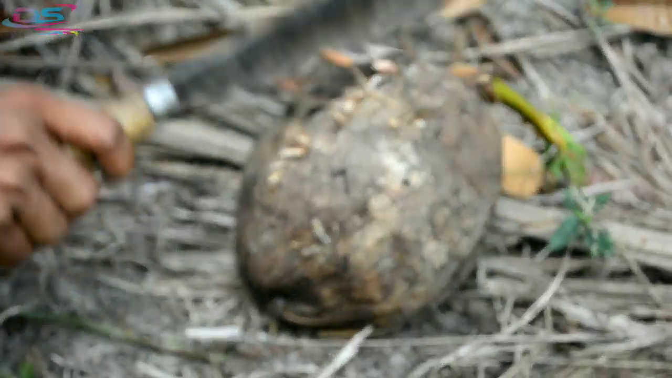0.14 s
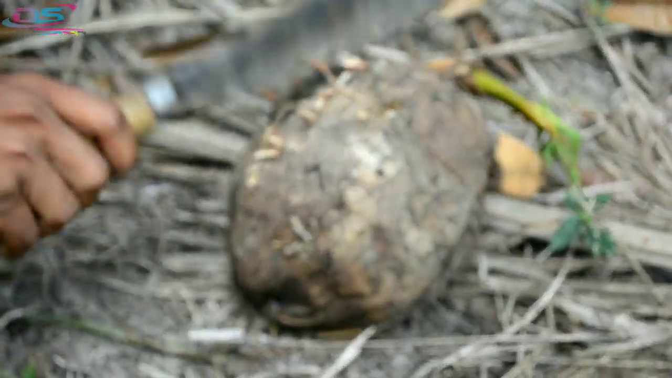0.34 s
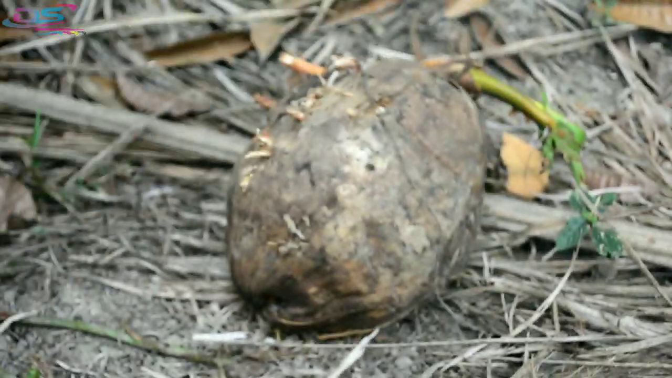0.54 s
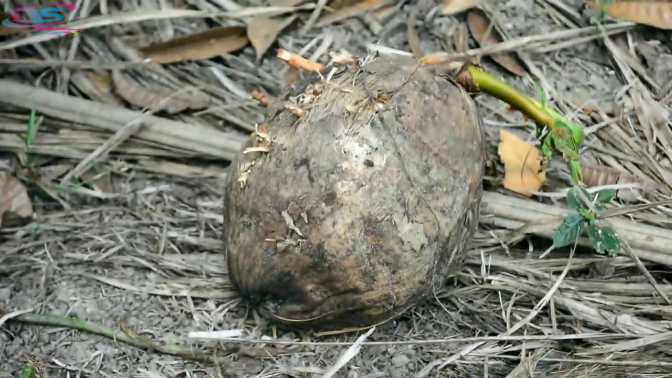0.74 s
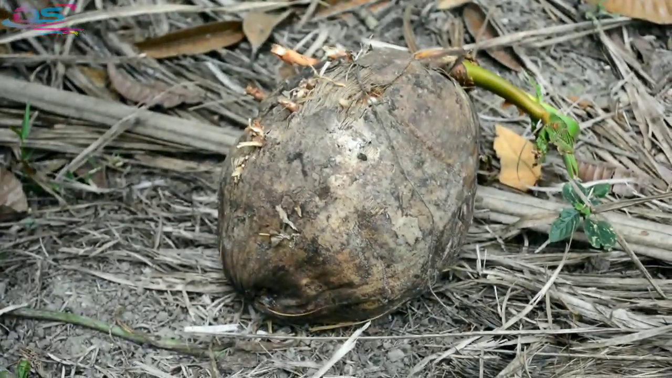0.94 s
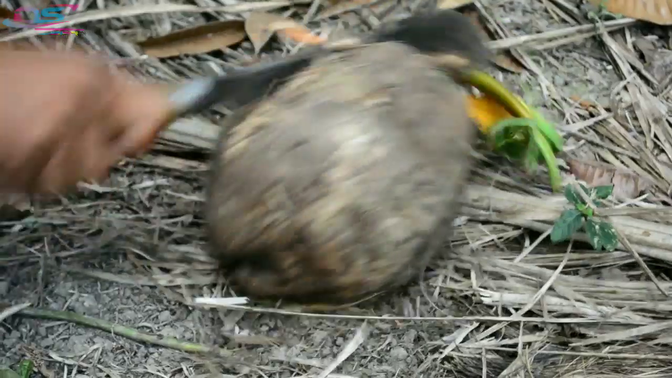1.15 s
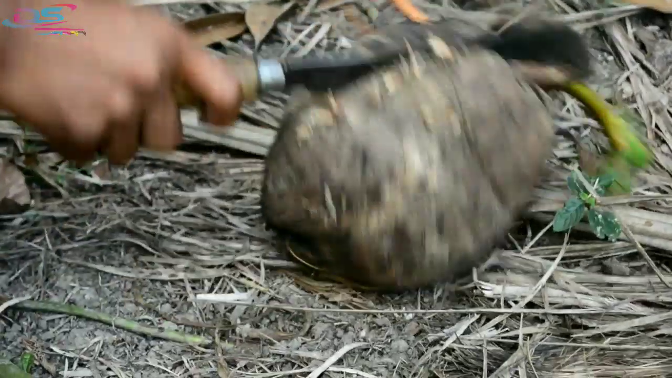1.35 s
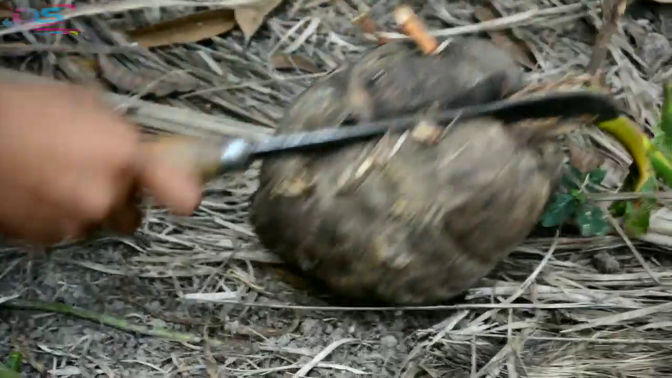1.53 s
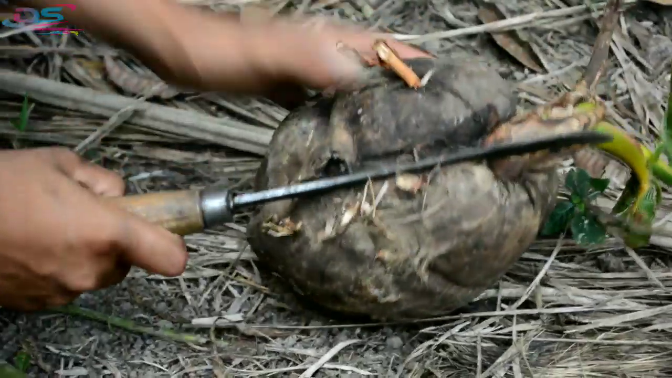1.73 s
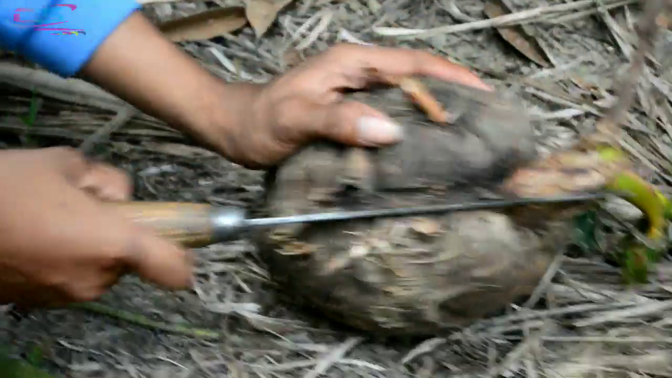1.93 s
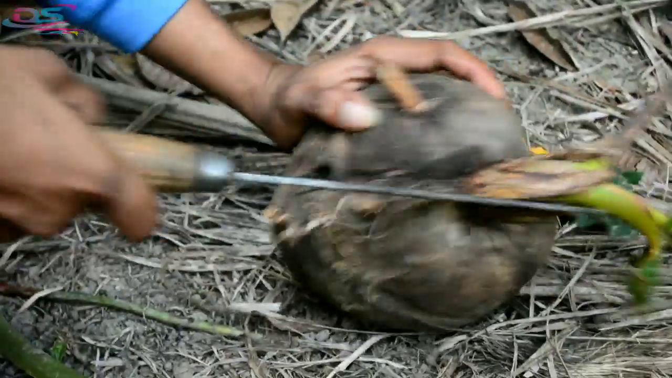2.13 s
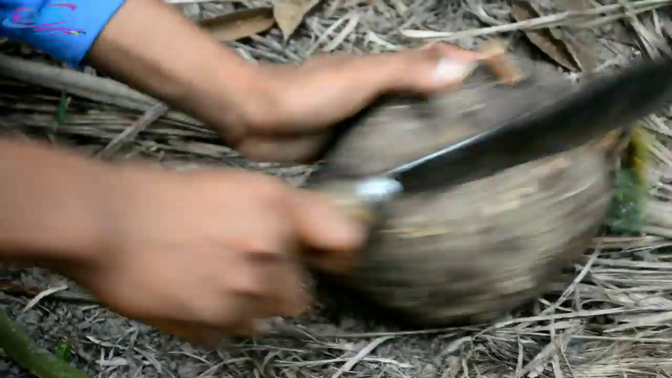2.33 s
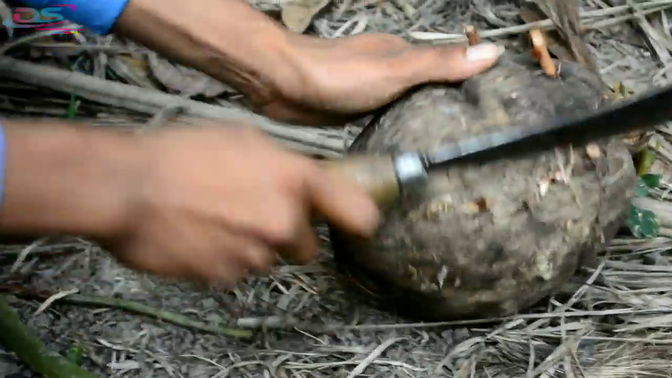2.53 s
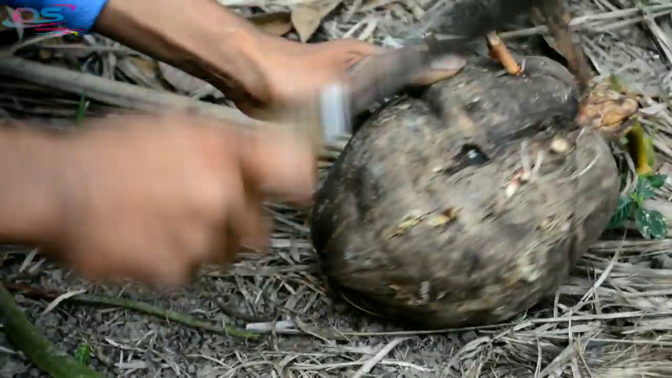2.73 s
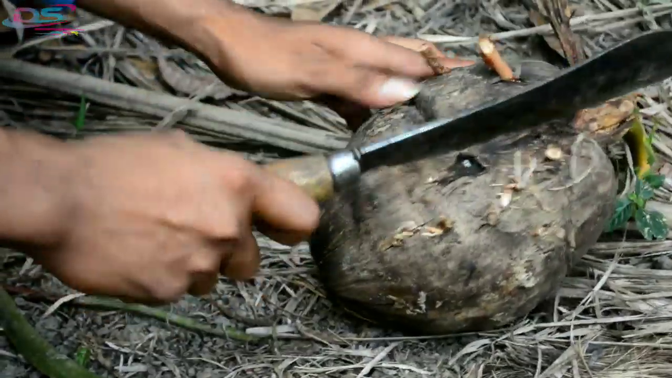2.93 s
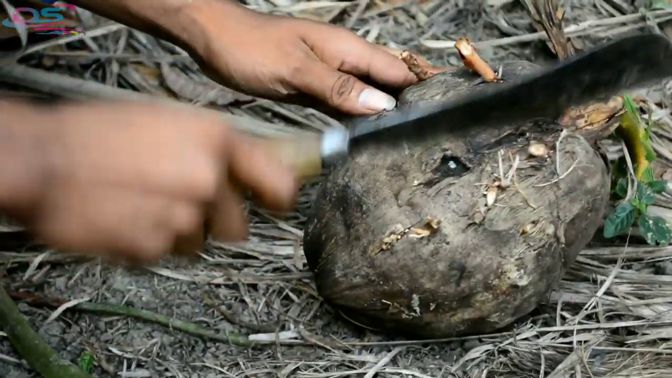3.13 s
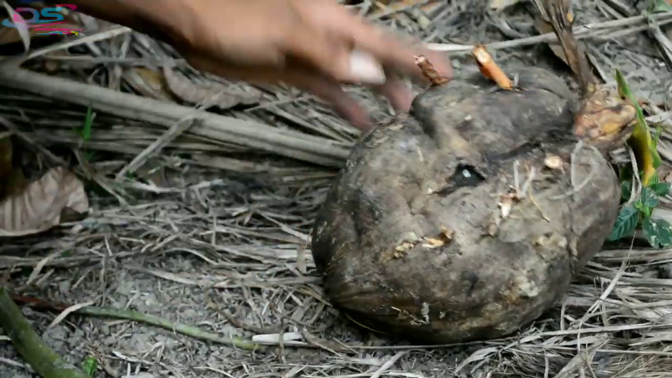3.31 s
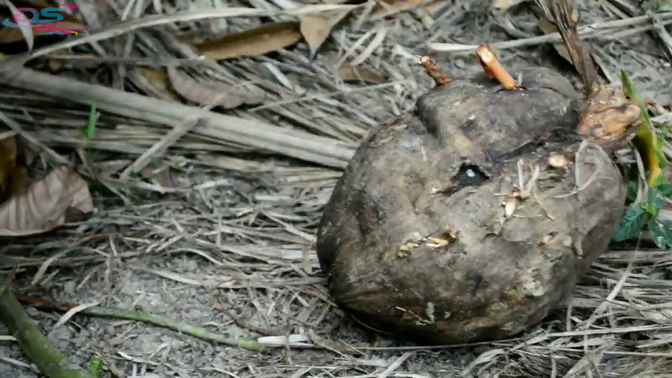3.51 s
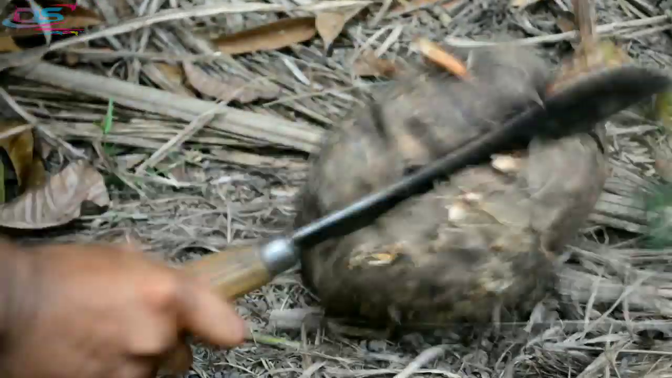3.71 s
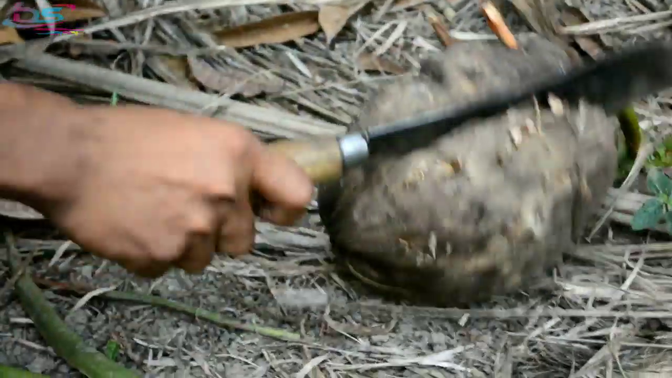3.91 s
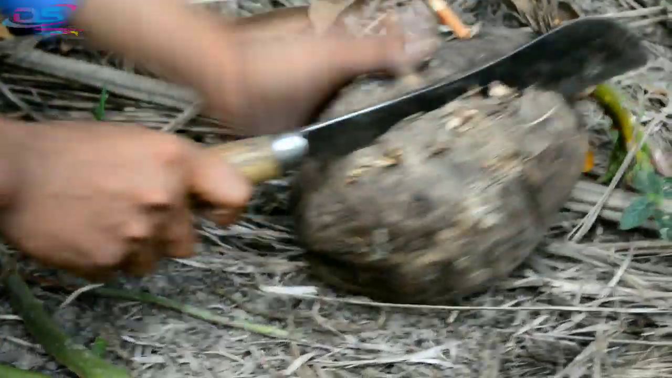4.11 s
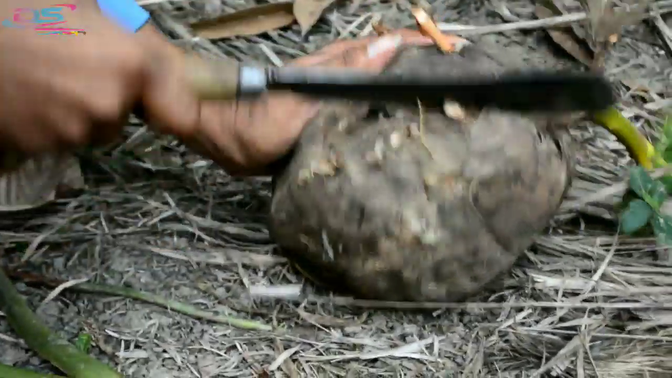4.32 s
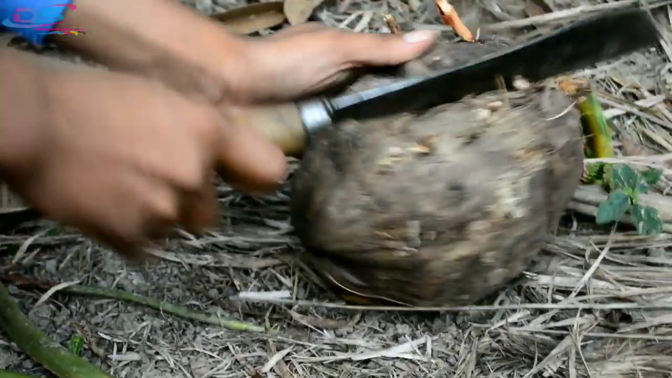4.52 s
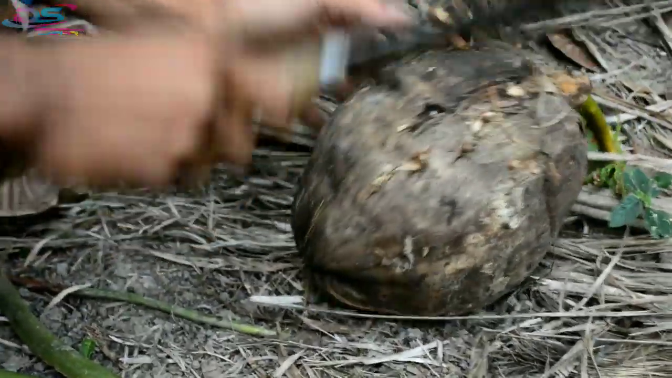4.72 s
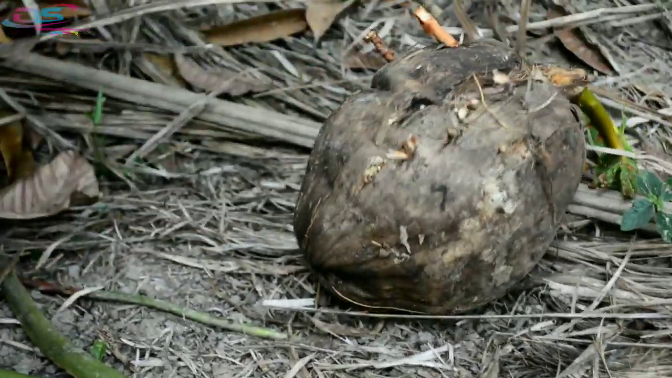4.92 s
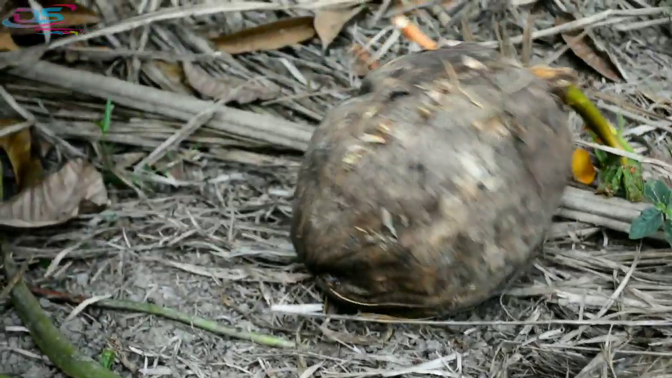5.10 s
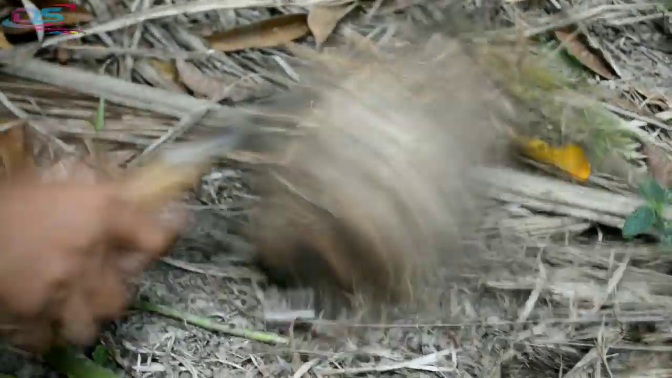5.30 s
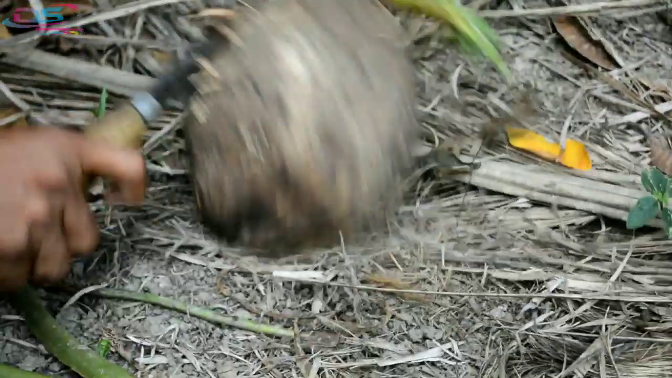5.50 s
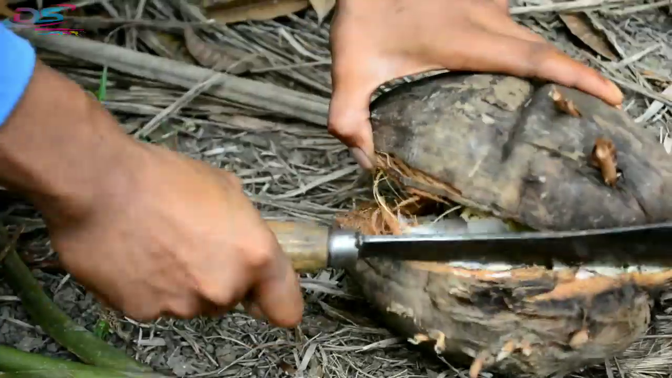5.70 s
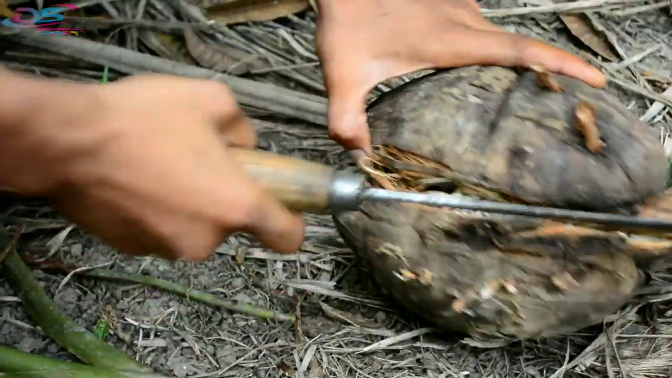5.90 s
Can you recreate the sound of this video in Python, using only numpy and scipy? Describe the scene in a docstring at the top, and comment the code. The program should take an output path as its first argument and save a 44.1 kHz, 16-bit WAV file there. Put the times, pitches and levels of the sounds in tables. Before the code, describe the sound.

Close outdoor sound of a machete biting a coconut on dry leaf litter. A hard, woody crack comes first after a quiet second, then two duller, thudding chops much later. Between them come light taps, blade slips, scrapes, stalk snaps and papery rustling. Thin insects buzz over a faint hush. The blows clip flat, and the sound drops out near the end.

```python
"""Chopping a coconut on dry palm litter

A machete bites three times into a nut close to the microphone: struck modes and tearing fibres, clipped flat.
Between blows the blade taps, slips and scrapes, stalks snap and the nut knocks as it rocks: more short rings and
rasps. The leaves under it rustle, as clouds of tiny fractures ringing through drifting resonances.
Thin insect buzzes, gliding narrow noise, come and go over quiet open country, which is filtered noise.
Just before the end everything cuts out, then starts to fade back in."""
import sys
import numpy as np
from scipy import signal
from scipy.fft import rfft, irfft
from scipy.io import wavfile
from scipy.ndimage import uniform_filter1d

SR = 44100
rng = np.random.default_rng(int(sys.argv[2]) if len(sys.argv) > 2 else 0)


def digitize_waveform(pressure):
    """Quantize a signal to 16-bit integers and store it at the path in sys.argv[1].

    Rows of a 2-D input are taken as channels; values are limited to [-1, 1].
    """
    field = np.atleast_2d(pressure).T
    bounded = np.clip(field, -1, 1)
    quanta = np.round(bounded * 32767).astype(np.int16)
    wavfile.write(sys.argv[1], SR, quanta)


N = 262395
TIME = np.arange(N) / SR

# the three chops: (time [s], level [dB], frequency favoured by the spot struck [Hz], emphasis there [dB],
# thud [dB], fibre crack [dB], crushing decay [s], swish [dB], shaken litter [dB],
# first peak of the rocking after the blow [s], decay of the rocking [s])
CHOP_BLOWS = [(1.1397, 8, 1648, 13, -1.5, -18, 0.0017, -39, -22.5, .038, 0.41),
              (3.8179, -0.5, 995, 3, 5.5, -15, 0.006, -40, -22.5, .058, 0.3),
              (5.433, 1.5, 1186, 8.5, 4.5, -24, 0.0032, -48.5, -19.5, .05, 0.2)]
# spectrum of tearing husk fibres: (frequency [Hz], level [dB])
FIBRE_SPECTRUM = [(300, -31), (1200, -4), (2500, -2.5), (4500, -2), (6500, -2.5), (8700, -2), (11000, -8.5),
                  (13500, -16), (15500, -26)]


def amp(db):
    """Decibels to gain."""
    return 10 ** (np.asarray(db) / 20)


def unit(x):
    """Scale to rms 1."""
    return x / np.sqrt(np.mean(x ** 2))


def burst(x):
    """Scale a short sound so that its energy, spread over 10 ms, has rms 1."""
    return x * np.sqrt(SR / 100 / np.sum(x ** 2))


def add(track, s, x):
    """Mix x into the track from time s."""
    i = int(s * SR)
    track[i:i + len(x)] += x[:N - i]


def colour(x, points):
    """Causal minimum-phase filter through (Hz, dB) points, built by folding the cepstrum."""
    hz, db = np.transpose(points)
    f = np.fft.rfftfreq(4096, 1 / SR)
    log_gain = np.log(amp(np.interp(np.log(f + 1), np.log(hz), db)))
    cepstrum = irfft(log_gain)
    cepstrum[1:len(f) - 1] *= 2
    cepstrum[len(f):] = 0
    response = irfft(np.exp(rfft(cepstrum)))
    return signal.fftconvolve(x, response)[:len(x)]


def walk(rate):
    """Smooth random drift of rms 1, heading for a new value `rate` times a second."""
    k = int(SR / rate)
    steps = np.repeat(rng.standard_normal(N // k + 1), k)
    smooth = uniform_filter1d(uniform_filter1d(steps, k), k)
    return unit(smooth[:N])


def grains(n, rate, spread_db):
    """Tiny fractures at random times, `rate` a second: many weak ones, a few strong; rms 1."""
    size = amp(spread_db * np.minimum(rng.exponential(size=n), 5))
    happens = rng.random(n) < rate / SR
    return unit(rng.standard_normal(n) * size * happens)


def air():
    """The faint hush of the open country: coloured noise whose level drifts slowly."""
    # spectrum of the hush: (frequency [Hz], level [dB])
    hush_spectrum = [(18, -50.5), (30, -18), (107, 1), (205, -4), (304, 1), (384, -4), (612, 0.5),
                     (735, -0.5), (1240, -0.5), (1410, -2.5), (2030, -3.5), (9390, -20), (11300, -24),
                     (15000, -35)]
    hush = unit(colour(rng.standard_normal(N), hush_spectrum))
    return hush * amp(-57 + .5 * walk(6.5))


def leaves(body_db, crisp_db, rate=9000, spread_db=3.0, flicker_db=3.0, flicker_rate=70):
    """Dry litter crackles: ever different leaves ring briefly under a crisp top of small fractures."""
    # spectrum of the ringing leaves: (frequency [Hz], level [dB])
    body_spectrum = [(100, -23), (300, -16), (600, -7), (1200, 1), (2000, 3), (3000, 1), (4500, -4.5),
                     (7000, -38.5)]
    # spectrum of the crisp top: (frequency [Hz], level [dB])
    crisp_spectrum = [(2500, -15), (4500, 0), (6500, -1.5), (8700, 0.5), (11000, -5.5), (14000, -16.5),
                      (16000, -21)]
    crackle = grains(N, rate, spread_db)
    papery = np.zeros(N)
    for hz in np.geomspace(150, 7000, 20):
        # each resonance hears the common crackle plus its own, and flickers on its own
        fractures = crackle + grains(N, rate, spread_db)
        ringing = signal.lfilter(*signal.iirpeak(hz, 5, fs=SR), fractures)
        papery += ringing * amp(flicker_db * walk(flicker_rate)) / np.sqrt(hz)
    body = unit(colour(papery, body_spectrum)) * amp(body_db)
    crisp = unit(colour(crackle + grains(N, rate, spread_db), crisp_spectrum))
    return body + crisp * amp(body_db + crisp_db)  # crispness is relative to the body


def stirring():
    """How hard the leaves are worked (level, crispness in dB): idle creep, rocking after chops, and shifts."""
    # the nut or the hand shifts and presses the leaves:
    # (time [s], length [s], level [dB], crispness relative to it [dB])
    shift_moves = [(.02, 0.022, -53, -9), (.16, 0.11, -54.5, -14), (.315, 0.041, -51.5, -3.5),
                   (.39, 0.2, -60, -2.5), (.68, .15, -56, -6), (1.356, .025, -48.5, 4.5),
                   (1.39, 0.12, -52.5, 1.5), (1.8, 0.098, -50, -6.5), (1.9, 0.13, -55, -6.5),
                   (2.11, 0.074, -47.5, -4.5), (2.165, 0.073, -45.5, -0.5), (2.33, .18, -42, -11),
                   (2.4, 0.077, -47, -5.5), (2.62, 0.014, -49, -8.5), (2.895, 0.041, -46.5, -3.5),
                   (2.95, 0.14, -60, -11.5), (3.395, 0.017, -60.5, 2), (3.47, 0.055, -64, -0.5),
                   (3.67, 0.034, -63, -2), (4.07, 0.053, -44.5, -29), (4.2, .13, -46, -13),
                   (4.32, .11, -42, -7), (4.51, 0.085, -46.5, -10), (4.6, 0.06, -50, -4.5),
                   (5.01, 0.21, -54, -10.5), (5.659, 0.019, -47, 0.5)]
    press_share, release_s = 0.25, 0.031  # share of the length spent building up; decay as the leaves spring back
    rock_s, rock_depth_db = 0.059, 2.5  # one wobble of the nut; swell and sinking of the rustle with it

    moves = [(0, np.ones(N), -63, -5)]  # the litter is never quite still
    for s, *_, peak_s, rest_s in CHOP_BLOWS:
        wobble = amp(rock_depth_db * np.cos(2 * np.pi * (TIME - peak_s) / rock_s))
        moves.append((s, wobble * np.exp(-TIME / rest_s), -39, -6))
    t = TIME[:SR]
    for s, length, db, crisp_db in shift_moves:
        build_up = np.minimum(t / (press_share * length), 1)
        spring_back = np.exp(-np.maximum(t - length, 0) / release_s)
        moves.append((s, build_up * spring_back, db, crisp_db))

    # powers add up, since the leaves crackle independently
    body_power, crisp_power = np.zeros(N), np.zeros(N)
    for s, envelope, db, crisp_db in moves:
        add(body_power, s, (amp(db) * envelope) ** 2)
        add(crisp_power, s, (amp(db + crisp_db) * envelope) ** 2)
    return 10 * np.log10(body_power), 10 * np.log10(crisp_power / body_power)


def rustle(splinter_db=-15.0, clump_db=1.0):
    """Handling the nut stirs the leaves under it in uneven clumps; now and then a fibre splinters."""
    stir_db, crisp_db = stirring()
    stir_db = stir_db + clump_db * walk(50)
    splinters = unit(colour(grains(N, 200, 2.0), FIBRE_SPECTRUM)) * amp(stir_db + splinter_db)
    return splinters + leaves(stir_db, crisp_db, rate=11000, spread_db=2.5, flicker_db=3.5)


def snaps(snap_s=0.0011, stalk_q=0.9):
    """Single dry stalks break with a tick through a broad resonance; thick ones sound low, thin ones high."""
    # snapping stalks: (time [s], level [dB], stalk resonance [Hz])
    stalk_breaks = [(.032, -55.5, 2000), (0.134, -52.5, 2130), (0.6928, -55, 6000), (0.9817, -43, 6640),
                    (1.3617, -50, 5000), (1.8244, -53, 2987), (2.1257, -46, 2200), (3.1097, -45.5, 4050),
                    (3.4817, -55.5, 1973), (5.1498, -55.5, 3500), (5.1968, -48.5, 1380),
                    (5.2226, -50, 1190)]
    out, t = np.zeros(N), np.arange(SR // 20) / SR
    for s, db, hz in stalk_breaks:
        tick = colour(rng.standard_normal(len(t)) * np.exp(-t / snap_s), FIBRE_SPECTRUM)
        stalk = signal.iirpeak(hz, stalk_q, fs=SR)
        ringing = signal.lfilter(*stalk, signal.lfilter(*stalk, tick))
        add(out, s, amp(db) * burst(ringing))
    return out


def rasp(length, first_hz, last_hz, width_hz):
    """Irregular slips in one gliding resonance, as noise within width_hz either side; swells and fades; rms 1."""
    n = int(length * SR)
    lowpass = signal.butter(2, width_hz, fs=SR, output="sos")
    slow = signal.sosfilt(lowpass, rng.standard_normal((2, SR)))[:, -n:]
    phase = 2 * np.pi * np.cumsum(np.linspace(first_hz, last_hz, n)) / SR
    tone = slow[0] * np.sin(phase) + slow[1] * np.cos(phase)
    swell = np.sqrt(np.abs(np.sin(np.linspace(0, np.pi, n))))
    return unit(tone * swell)


def insects(width_hz=220):
    """Insects buzz as narrow, raspy high notes that glide a little."""
    # buzzes: (time [s], length [s], first frequency [Hz], last frequency [Hz], level [dB])
    buzz_notes = [(.16, 0.1, 8400, 8040, -71), (0.397, 0.12, 5960, 6800, -65), (.56, 0.1, 5340, 5220, -65),
                  (.61, 0.15, 4440, 4700, -66), (0.797, .28, 5530, 5850, -63.5),
                  (1.58, 0.21, 5780, 6100, -65), (2.062, 0.094, 6800, 7230, -59.5),
                  (2.258, 0.31, 8030, 8670, -60), (2.519, 0.27, 7760, 7300, -63.5),
                  (4.046, 0.19, 6784, 6900, -64), (4.037, 0.09, 5700, 6100, -56.5)]
    out = np.zeros(N)
    for s, *shape, db in buzz_notes:
        add(out, s, amp(db) * rasp(*shape, width_hz))
    return out


def strike(db, spot_hz, spot_db, thud_db, crack_db, crush_s, spot_octaves=.3, yielding=.4):
    """The blade's push rings the nut while fibres tear; the spot struck picks the strongest modes."""
    # modes of the nut with the blade in it: (frequency [Hz], level [dB], 60 dB decay time [s])
    nut_modes = [(108.4, -19, 0.034), (131.5, -15.5, 0.029), (215, -8, 0.023), (287, -11.5, .025),
                 (334, -10, 0.026), (434, -16.5, 0.037), (535, -2, 0.016), (718, -8, 0.023),
                 (847, -8.5, 0.013), (1003, -3.5, 0.016), (1162, -2.5, 0.018), (1412, -5, 0.016),
                 (1633, -1.5, 0.016), (1870, -4.5, 0.016), (2190, 0, 0.016), (2375, -7, 0.021),
                 (2866, -6, 0.019), (3380, -5, .017), (3860, -12.5, 0.011), (4510, -15, .016),
                 (4840, -15.5, 0.0046)]
    t = np.arange(SR // 6) / SR
    fibres = burst(grains(len(t), 30000, 0.92) * np.exp(-t / crush_s))
    force = .25 * fibres / np.sqrt(np.sum(fibres ** 2))
    force[0] += 1  # the push itself

    hz, mode_db, t60 = np.transpose(nut_modes)[:, :, None]
    mode_db = mode_db + spot_db * np.exp(-(np.log2(hz / spot_hz) / spot_octaves) ** 2)
    mode_db = mode_db + thud_db / (1 + (hz / 750) ** 4)  # a heavy blow drives the low modes against the ground
    sign = (-1) ** np.arange(len(hz))[:, None]
    ring = np.sum(sign * amp(mode_db - 60 * t / t60) * np.sin(2 * np.pi * hz * t), axis=0)
    ring *= 1 - np.exp(-t / (yielding * crush_s))  # the soft husk gives way before the shell takes the blow
    body = burst(signal.fftconvolve(force, ring)[:len(t)])
    crack = burst(colour(fibres, FIBRE_SPECTRUM))
    return amp(db) * (body + amp(crack_db) * crack)


def taps():
    """Light touches of the blade ring the nut through its husk."""
    # taps: (time [s], level [dB], frequency favoured by the spot struck [Hz], emphasis there [dB],
    # thud [dB], fibre crack [dB], crushing decay [s])
    tap_blows = [(.509, -31, 1050, 9, -13, -19, 0.0082), (0.539, -46, 1150, 11, -22, -12, .004),
                 (.9815, -45.5, 911, 12.5, 0, -4, 0.0023), (2.8952, -18.5, 1480, 7.5, -1, -9, 0.0019),
                 (4.3211, -21.5, 2300, 9, -21.5, -19.5, 0.00076),
                 (4.3267, -28, 1390, 10, -42, -13.5, 0.0098), (4.5134, -40.5, 1150, 9, 1, -23, .0024),
                 (4.7501, -50.5, 2000, 5, -14.5, -7, .00075), (5.6673, -43, 1150, 12, -3, -16, 0.0017)]
    out = np.zeros(N)
    for s, *blow in tap_blows:
        add(out, s, strike(*blow, spot_octaves=0.47, yielding=0.26))
    return out


def chops(settle_s=0.04, shaken_crisp_db=-3, split_db=-17, split_s=0.0081, swish_s=.013):
    """The blade swishes down and bites; the husk splits ahead of it; the nut jumps and shakes the litter."""
    # air round the falling blade: (frequency [Hz], level [dB])
    swish_spectrum = [(60, -5), (400, -3.5), (1000, 0.5), (1800, -4), (4000, -25), (12000, -40.5)]
    out, shaken = np.zeros(N), np.full(N, 1e-6)
    t = np.arange(SR // 2) / SR
    for s, *blow, swish_db, litter_db, _, _ in CHOP_BLOWS:
        swish = unit(colour(rng.standard_normal(len(t)), swish_spectrum))
        add(out, s - len(t) / SR, amp(swish_db) * swish * np.exp(-t[::-1] / swish_s))  # grows up to the blow
        add(out, s, strike(*blow, spot_octaves=0.34, yielding=0.38))
        tearing = grains(len(t), 9700, 2.0) * np.exp(-t / split_s)
        add(out, s, amp(split_db) * burst(colour(tearing, FIBRE_SPECTRUM)))
        add(shaken, s, amp(litter_db) * np.exp(-t / settle_s))
    settling_db = 20 * np.log10(shaken) + 1.6 * walk(120)  # the leaves fall back in uneven clumps
    return out + leaves(settling_db, shaken_crisp_db, rate=9000, spread_db=2.5, flicker_db=0.5)


def scrapes(width_share=0.11):
    """The blade grinds in the cut and the husk drags over the ground, as rasps at a steady pitch."""
    # steel and husk rubbing: (time [s], length [s], frequency [Hz], level [dB])
    rubs = [(1.164, 0.071, 1722, -34.5), (1.229, 0.046, 1170, -47), (1.482, 0.093, 2220, -59),
            (2.129, 0.064, 2160, -45.5), (2.406, 0.083, 2200, -47), (2.965, .12, 1982, -53.5),
            (4.361, 0.073, 2650, -43.5), (5.455, 0.042, 1136, -36), (5.503, 0.1, 1220, -46.5)]
    out = np.zeros(N)
    for s, length, hz, db in rubs:
        add(out, s, amp(db) * rasp(length, hz, hz, width_share * hz))
    return out


def knocks(spot_db=18.5, crack_db=-10, crush_s=.0055):
    """The nut rocks and knocks softly on the ground, ringing its low modes."""
    # knocks: (time [s], level [dB], frequency favoured [Hz], thud [dB])
    ground_knocks = [(1.376, -45, 610, -11), (1.413, -44, 390, -3), (1.44, -50, 423, 8),
                     (2.444, -38, 760, -16), (3.94, -35.5, 597, -12), (4.014, -48.5, 400, 4),
                     (4.048, -48, 400, 10), (4.068, -48, 394, 6), (4.086, -40, 410, 14),
                     (4.209, -44, 306, -3)]
    out = np.zeros(N)
    for s, db, hz, thud_db in ground_knocks:
        add(out, s, strike(db, hz, spot_db, thud_db, crack_db, crush_s))
    return out


def slips(spot_db=8.5, thud_db=-7.5, crush_s=.0015):
    """The wedged blade slips in the cut as it comes free, each slip a short strike on the nut."""
    # slips: (time [s], level [dB], frequency favoured [Hz], fibre crack [dB])
    blade_slips = [(2.2103, -39.5, 1900, 2.5), (2.2204, -40.5, 1100, 1), (2.2256, -31, 1700, 0),
                   (2.261, -41, 2480, -14), (2.506, -43, 1900, -22), (2.5348, -42.5, 1480, -4),
                   (2.5938, -49, 1500, -13), (3.8335, -26, 1100, -11.5), (3.8649, -31, 2000, 5),
                   (3.873, -35.5, 1200, 3), (5.4675, -28, 2220, 3)]
    out = np.zeros(N)
    for s, db, hz, crack_db in blade_slips:
        add(out, s, strike(db, hz, spot_db, thud_db, crack_db, crush_s))
    return out


def blade_ring():
    """The free steel sings after one light tap, as a single decaying high mode."""
    # the ringing steel: (time [s], frequency [Hz], level [dB], 60 dB decay time [s])
    steel_mode = (2.896, 11500, -47, .16)
    out, t = np.zeros(N), np.arange(SR // 2) / SR
    s, hz, db, t60 = steel_mode
    add(out, s, amp(db - 60 * t / t60) * np.sin(2 * np.pi * hz * t))
    return out


def outdoors(x, echo_db=-27, build_s=0.0043, decay_s=0.027):
    """Trunks and ground scatter a weak, diffuse echo: a short decaying noise tail."""
    # spectrum of the scattered sound: (frequency [Hz], level [dB])
    echo_spectrum = [(100, -4.5), (500, -10.5), (1400, -3.5), (3000, 3.5), (10000, 5.5)]
    t = np.arange(SR) / SR
    tail = rng.standard_normal(SR) * np.exp(-t / decay_s) * (1 - np.exp(-t / build_s))
    echo = colour(tail, echo_spectrum)
    echo = echo / np.sqrt(np.sum(echo ** 2))
    return x + amp(echo_db) * signal.fftconvolve(x, echo)[:N]


def scene(air_side_db=-4):
    """The work lies ahead with a phase gap between the ports; leaves and air spread by side sounds of their own."""
    # stereo width of work and leaves: (frequency [Hz], side minus mid [dB])
    side_spectrum = [(100, -30.5), (1000, -28.5), (2000, -24.5), (4000, -19), (8000, -10.5), (12000, -10),
                     (15000, -15)]
    contacts = chops() + taps() + knocks() + slips() + blade_ring() + snaps()
    work = outdoors(contacts) + scrapes()
    mid = work + rustle() + insects() + air()
    hz, db = np.transpose(side_spectrum)
    width = amp(np.interp(np.log(np.fft.rfftfreq(N, 1 / SR) + 1), np.log(hz), db))
    # 1j turns the work by a quarter cycle, so left and right differ in phase and not in level
    near_side = irfft(width * (1j * rfft(work) + rfft(rustle())), N)
    side = near_side + amp(air_side_db) * air()
    return np.array([mid + side, mid - side])


def record(dry, low_cut_hz=55, top_hz=15500):
    """The microphone loses the deepest bass; the input clips flat on the blows; the top is cut."""
    # the sound cuts out and starts to fade back in: (time [s], level [dB])
    fade_points = [(0, 0), (5.706, 0), (5.709, -60), (5.82, -50), (5.9, -18), (5.95, -11)]
    low_cut = signal.butter(2, low_cut_hz, "high", fs=SR, output="sos")
    thin = signal.sosfilt(low_cut, dry)
    clipped = np.clip(thin, -.98, .98)
    faded = clipped * amp(np.interp(TIME, *np.transpose(fade_points)))
    return signal.fftconvolve(faded, signal.firwin(127, top_hz, fs=SR)[None], mode="same")


dry = scene()
out = record(dry)
digitize_waveform(out)
```